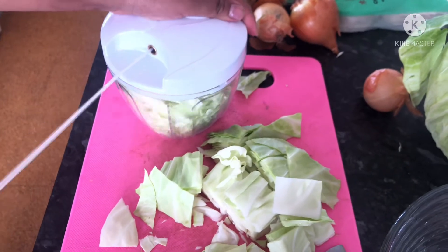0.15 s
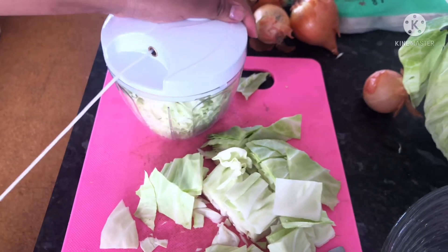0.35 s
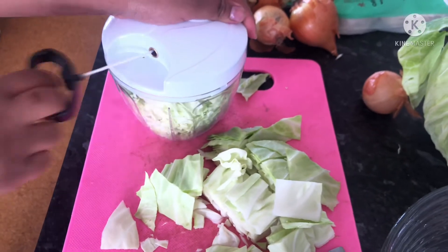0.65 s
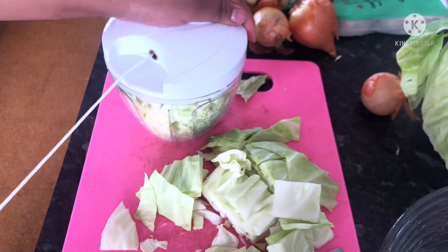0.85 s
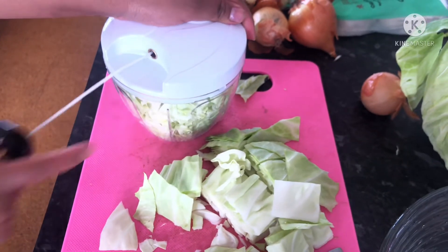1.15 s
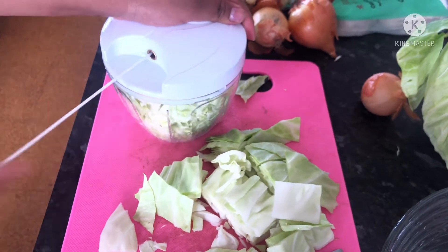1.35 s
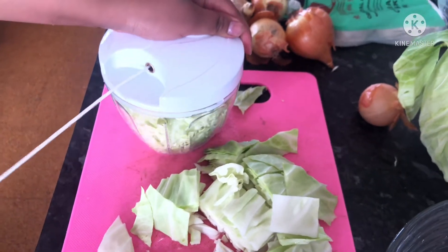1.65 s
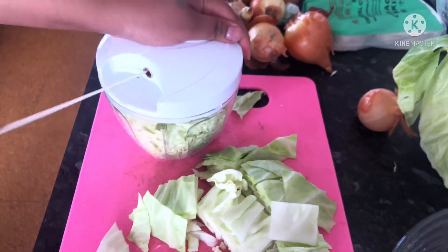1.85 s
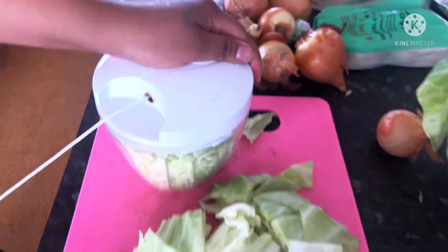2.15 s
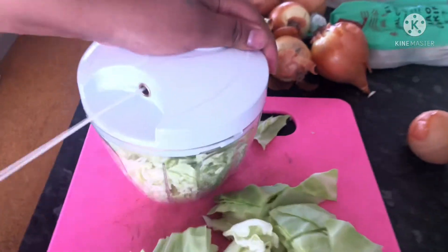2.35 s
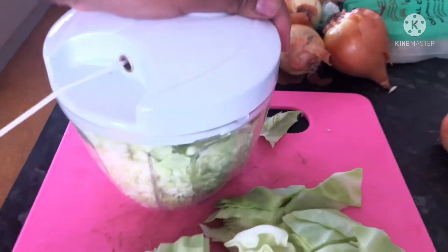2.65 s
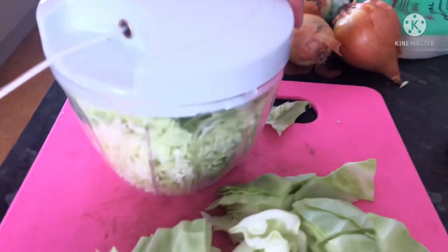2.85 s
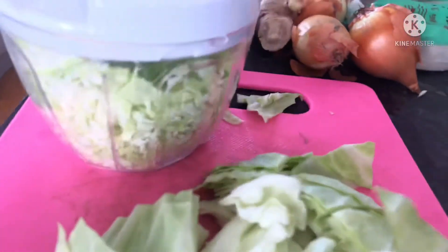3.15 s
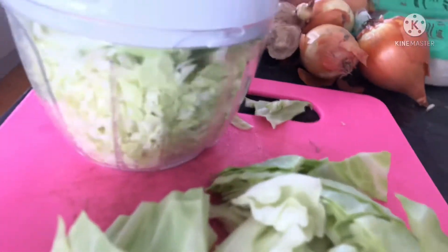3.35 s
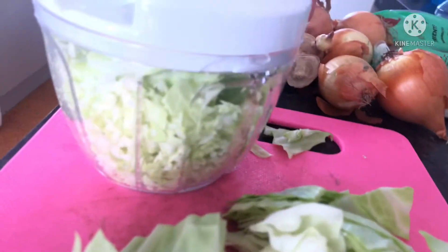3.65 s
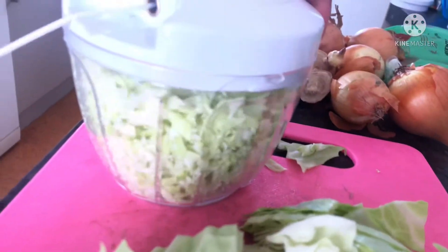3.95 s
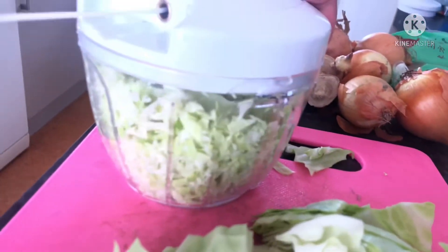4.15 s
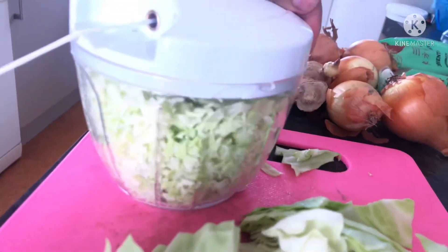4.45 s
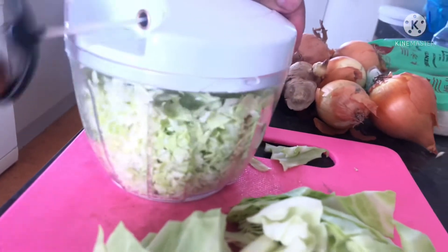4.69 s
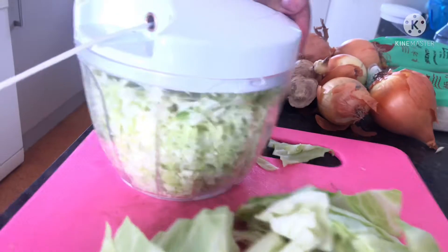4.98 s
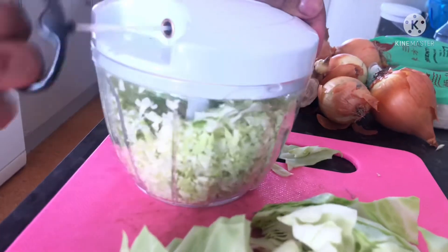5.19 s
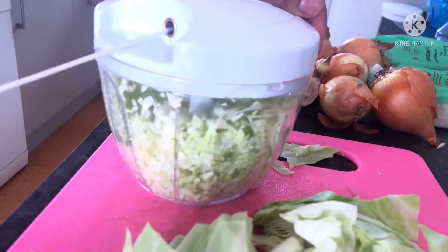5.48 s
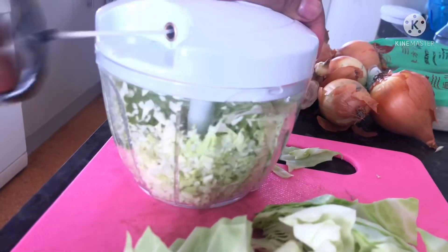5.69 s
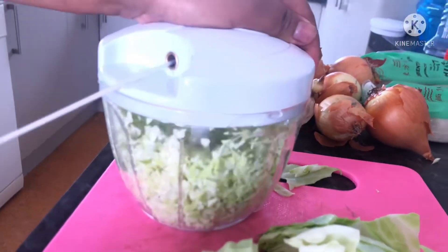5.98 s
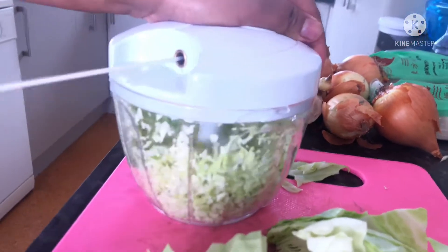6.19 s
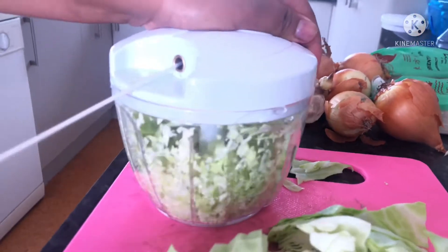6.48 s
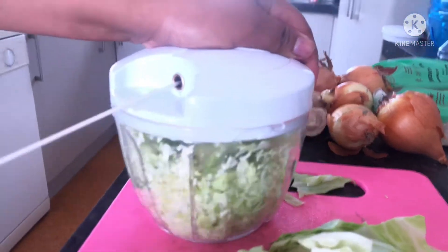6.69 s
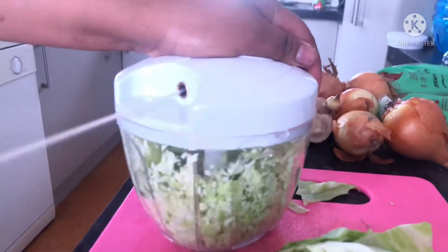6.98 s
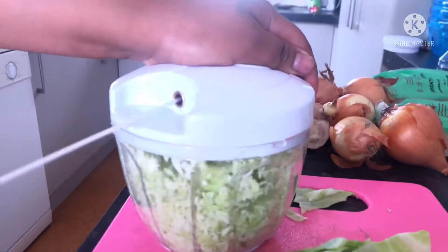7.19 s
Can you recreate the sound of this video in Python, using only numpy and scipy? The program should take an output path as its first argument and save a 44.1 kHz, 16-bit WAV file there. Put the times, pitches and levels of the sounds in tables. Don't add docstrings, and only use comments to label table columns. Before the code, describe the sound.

A small plastic pull-cord chopper is worked close to the microphone in a hard kitchen. Each stroke starts with a sharp clutch crack, then rattling gear teeth and blades knock the hollow bowl while leaves shred. The cord runs back with a fast, bright ratchet rasp that slows before the next crack. About two strokes a second, with one weaker pull early, then louder and fuller as the microphone nears.

```python
import sys
import numpy as np
from scipy import signal
from scipy.fft import rfft, irfft, next_fast_len
from scipy.io import wavfile
from scipy.ndimage import uniform_filter1d

SR = 44100
rng = np.random.default_rng(int(sys.argv[2]) if len(sys.argv) > 2 else 0)


def boost_factor(decibels):
    exponent = np.asarray(decibels, float) / 20
    return 10 ** exponent


def to_wav(s):
    ch = np.atleast_2d(s).T
    pcm = np.round(np.clip(ch, -1, 1) * 32767)
    wavfile.write(sys.argv[1], SR, pcm.astype(np.int16))


N = 323253
T = np.arange(N) / SR

# let_go_s, fastest_s, spring_spent_s, ratchet_db, bowl_share_db
REWINDS = [(-.1, -0.033, .105, -17, -5), (0.416, 0.482, .67, -17.5, -4), (0.94, 0.961, 1.2, -21.5, -4),
           (1.699, 1.769, 1.955, -21.5, -4), (2.269, 2.328, 2.54, -18, -4),
           (2.861, 2.924, 3.135, -15.5, -6), (3.493, 3.548, 3.73, -13.5, -6.5),
           (3.99, 4.073, 4.24, -13, -7.5), (4.519, 4.59, 4.76, -13.5, -7), (5.023, 5.099, 5.245, -12, -7),
           (5.521, 5.574, 5.73, -13, -5), (6.011, 6.058, 6.21, -13, -6), (6.46, 6.522, 6.655, -13.5, -5),
           (6.921, 6.979, 7.115, -13.5, -5)]
# start_s, peak_db, bowl_share_db, tooth_share_db
CATCHES = [(0.1121, 1.5, -0.5, -4), (0.6841, 5.5, -3, -10.5), (1.332, -11.5, 9, 9), (1.9596, 1, -5, -9),
           (2.5431, 6, -3.5, -6), (3.153, 4.5, -6.5, -4.5), (3.719, 6.5, -2.5, -10), (4.2472, 6, -6, -8),
           (4.769, 7.5, -3, -7.5), (5.2643, 7, -2.5, -7.5), (5.7393, 8.5, -3.5, -2.5),
           (6.2203, 8.5, -1, -3.5), (6.6508, -6, -1, -4), (7.105, 1.5, -1.5, -6)]
# full_speed_s, cord_out_s, end_bowl_db, gain_since_full_speed_db, chop_brightness_db
PULLS = [(0.187, 0.318, -10.5, 4.5, -11.5), (0.755, .87, -11.5, 4, -13.5), (1.446, 1.601, -21.5, 0, -12),
         (2.039, 2.168, -12, 4, -10.5), (2.656, 2.753, -14, -2, -8), (3.276, 3.389, -10.5, 4, -9),
         (3.774, 3.911, -8, 6, -7.5), (4.349, 4.448, -13, -4, -9), (4.837, 4.96, -10, 1.5, -9.5),
         (5.348, 5.442, -12.5, -2, -9.5), (5.839, 5.945, -15, -3.5, -9), (6.297, 6.396, -11.5, -1.47, -9),
         (6.739, 6.834, -15.5, 1.5, -9.5), (7.192, 7.283, -12, 0.65, -9)]
# start_s, peak_db
KNOCKS = [(0.2489, -3.5), (0.2976, -3), (0.3092, -12), (0.8508, -7), (1.5021, -9.5), (2.0156, -6),
          (2.0905, -1.5), (2.1173, -1), (2.155, -1), (2.1701, -2), (2.6471, -2.5), (2.6693, -1.5),
          (2.699, -1), (2.7419, -3.5), (3.2937, -7), (3.3563, -6), (3.3717, -1), (3.7681, -5), (3.8299, 1),
          (3.871, -1), (4.3187, -3.5), (4.4413, -5), (4.8748, -3), (4.9311, 1.5), (4.9757, -3),
          (5.3327, -1), (5.8676, -1), (6.3032, -2), (7.2047, 1), (7.2657, -2),
          (0.1394, -26), (0.1687, -16), (0.717, -18), (0.7481, -10), (1.356, -16), (1.3803, -20),
                (1.4503, -15), (1.5745, -14), (1.6073, -18), (3.813, -6), (3.8526, -4), (2.62, -11),
                (3.2387, -11), (4.267, -11), (4.8166, -6), (5.794, -12), (6.2514, -12), (6.2703, -7),
                (6.329, -16), (6.7229, -21), (7.1776, -6), (7.195, -4)]
# start_s, peak_db
TICKS = [(0.3315, -2.5), (0.4556, -9), (0.886, -12), (2.101, -10), (2.1747, -9), (2.4003, -12),
         (4.0012, -32), (2.2686, -8), (2.4331, -20), (2.7487, -7), (2.8617, -6), (3.0177, -15.5),
         (3.3696, -8.5), (3.8502, -12.5), (3.8967, -1), (3.9183, 2.5), (4.3718, -11), (4.4414, -5),
         (4.8902, -3), (4.9309, -2), (4.9517, -2), (5.4197, -7), (5.8677, -21), (5.9409, -1), (6.0088, -4),
         (6.3879, -5.5), (6.5891, -13), (6.8101, -9), (6.9199, -17), (7.2876, -4)]
# start_s, peak_db
DYING_TICKS = [(1.1224, -11), (1.1607, -14), (1.2099, -19), (1.2445, -27), (1.2703, -14.5), (1.2955, -42),
               (2.479, -5), (2.5088, -19), (3.1261, -25), (5.7043, -17), (6.8939, -22.5)]
# start_s, peak_db
ROCKS = [(0.4556, -16), (0.5026, -4.5), (0.5301, -4), (0.5585, -4.5), (2.984, -4), (1.6849, -14),
         (1.8008, -10), (3.037, -12), (3.0949, -15.5), (3.518, -9), (3.5442, -5.5), (3.5968, 0.5),
         (3.6228, -13), (4.118, -13), (4.1448, -7), (4.6278, -8), (4.6563, -12), (5.13, -9), (6.0783, -16),
         (6.1055, -6), (6.1348, -10), (6.5295, -9.5), (6.9832, -14), (7.0044, -7.5), (2.955, -12),
         (3.0226, -19), (1.05, -25)]
# time_s, pitch_hz, level_db
CORD = [
    (1.02, 223.7, -58),
    (1.04, 219, -31),
    (1.11, 214, -34),
    (1.135, 218, -60),
]
# time_s, level_db
GRIP = [(.2, -11.5), (.85, -5.5), (1.5, -12), (2.7, -18), (3.4, -25), (4.3, -20), (4.9, -8), (5.5, -11),
        (6.3, -14.5), (7.2, -13)]
# time_s, bass_db, lid_tone_db
PHONE_PATH = [
    (0, -8, 3),
    (2.4, -4, 2.5),
    (3.2, 1.5, 8),
    (4, 2, -4),
    (7.33, 3, -7),
]

# pitch_hz, width_hz, level_db
BOWL = [(259, 21, 1.5), (525, 64, -31), (726, 190, 1), (1100, 540, -3.5), (1698, 430, 0.5),
        (3170, 230, -10)]
# pitch_hz, width_hz, level_db
SPRING = [(6310, 240, -7.5), (7670, 390, -3), (8470, 390, 1), (9590, 350, 1.5), (10700, 230, -4),
          (11600, 340, -7)]
# pitch_hz, density_db_per_hz
RASP = [(2240, -60), (3800, -20), (4480, -2), (5390, -8), (6780, -3.5), (8490, 2.5), (10200, -11),
        (12000, -2), (15600, -14.5)]
# pitch_hz, density_db_per_hz
LID = [(3700, -48), (4200, 8), (4500, 11), (4800, 1), (5400, -42)]
# pitch_hz, density_db_per_hz
RUMBLE = [(24, -78), (40, -35), (76, -4), (560, -2), (734, -7.5), (856, -17), (1710, 2), (2120, -10.5),
          (2880, -2.5), (4000, -21.5), (5200, -53), (8800, -120)]
# pitch_hz, density_db_per_hz
SNAP = [(1000, -11), (2000, -2.5), (3100, 6), (4000, -5.5), (6000, -3.5), (9000, -21.5), (15600, -36)]
# pitch_hz, density_db_per_hz
CLUTCH = [(120, -31), (200, -31), (730, 1), (1750, -2), (3980, -12.5), (5130, -6), (6620, -15), (8390, -3),
          (9710, -9), (15600, -23)]
# pitch_hz, density_db_per_hz
DRONE = [(24, -44), (40, -32), (145, -11), (445, -7), (480, -0.5), (560, -1.5), (793, 6), (890, -0.5),
         (1750, -5.5), (4000, -20), (5200, -48), (8800, -120)]
# pitch_hz, density_db_per_hz
WALL = [(700, -41), (770, -8), (797, 7), (825, -24.5), (900, -35)]
# pitch_hz, density_db_per_hz
CHOP = [(1470, -40), (2500, -8), (4110, -3), (6030, -2.5), (9780, -11), (12500, -10.5), (15600, -26)]
# pitch_hz, density_db_per_hz
AIR = [(18, -19), (30, -28), (194, 7.5), (1010, -16.5), (1430, -33), (6380, -18), (16000, -39)]
# pitch_hz, t60_s
KITCHEN = [(200, 0.62), (2000, 0.42), (10000, 0.21)]

SNAP_BAND, TREBLE_BAND, RATCHET_BAND = (1800, 6000), (3000, 14000), (7000, 13000)
DRONE_BAND, RUMBLE_BAND = (400, 2500), (200, 2500)


def unit(x):
    return x / np.sqrt(np.mean(x ** 2) + 1e-20)


def along(points, hz):
    f, v = np.transpose(points)
    return np.interp(np.log(hz + 1), np.log(f + 1), v)


def split_events(events):
    s, db = np.transpose(events)
    return s, boost_factor(db)


def near(column):
    return boost_factor(np.interp(T, *np.transpose(PHONE_PATH)[[0, column]]))


def strokes(corners, fade):
    rows = []
    for first, *rest, last in corners:
        rows += [(first[0] - fade, -90, first[2]), first, *rest, last, (last[0] + fade, -90, last[2])]
    s, level_db, share_db = np.transpose(rows)
    return np.interp(T, s, level_db), np.interp(T, s, share_db)


def body(x, spectrum, modes, lift_db, band_hz):
    m = 2 * next_fast_len(N // 2 + 4096)
    hz = np.fft.rfftfreq(m, 1 / SR)
    colour_db = along(spectrum, hz)
    peaks = sum(boost_factor(2 * db) * w * w / (4 * (hz - c) ** 2 + w * w) for c, w, db in modes)
    lifted = boost_factor(2 * lift_db) * peaks / boost_factor(2 * np.maximum(colour_db, -20))
    gain = boost_factor(np.maximum(colour_db, -70)) * np.sqrt(1 + lifted)
    cep = irfft(np.log(gain), m)
    cep[1:m // 2] *= 2
    cep[m // 2 + 1:] = 0
    norm = np.sqrt(np.mean(gain ** 2 * (hz > band_hz[0]) * (hz < band_hz[1])))
    return irfft(rfft(x, m) * np.exp(rfft(cep)), m)[:N] / norm


def teeth(rate, jitter, scatter_db):
    count = np.cumsum(rate) / SR
    k = np.arange(1, int(count[-1]))
    uneven = jitter * rng.uniform(-1, 1, N // 64)[:len(k)]
    at = np.interp(k + uneven, count, np.arange(N)).astype(int)
    size = boost_factor(scatter_db * rng.standard_normal(N // 64)[:len(k)])
    return np.bincount(at, size, N)


def scrape(hits, t60, steady):
    soft = uniform_filter1d(hits, size=64)
    flare = signal.lfilter([1], [1, -boost_factor(-60 / (t60 * SR))], soft)
    return unit((unit(flare) + steady) * rng.standard_normal(N))


def bursts(events, t60, rise):
    hits = np.bincount(np.round(events[0] * SR).astype(int), events[1], N)[:N]
    t = np.arange(SR // 20) / SR
    shape = boost_factor(-60 * t / t60) * (1 - np.exp(-t / rise))
    return signal.fftconvolve(hits, shape)[:N] * rng.standard_normal(N)


def rewind_levels():
    let_go_db, jump_s, jump_db = -9.5, .025, -5.5
    hush_s = .008
    sag_db, stop_db, stop_power = 7.5, 21.5, 3.21
    linger = 0.31
    corners = []
    for (go, fast, spent, db, share_db), catch in zip(REWINDS, CATCHES):
        s = np.linspace(fast, catch[0] - hush_s, num=16)
        relaxed = (s - fast) / (spent - fast)
        slowed_db = np.minimum(stop_db * relaxed ** stop_power, 26)
        start = (go, db + let_go_db, share_db)
        jump = (min(go + jump_s, fast - .001), db + jump_db, share_db)
        run_down = zip(s, db - sag_db * relaxed - slowed_db, share_db + linger * slowed_db)
        corners.append([start, jump, *run_down])
    return strokes(corners, fade=.004)


def rewind():
    rasp_db, share_db = rewind_levels()
    speed = np.clip(2 + .025 * (rasp_db + 16), .2, 1.3)
    rocks = teeth(38 * speed, jitter=0.19, scatter_db=3.5)
    clicks = teeth(210 * speed, jitter=0.3, scatter_db=3.5)
    rasp = boost_factor(rasp_db - 1.5) * scrape(clicks + .4 * rocks, t60=.012, steady=.55)
    lid = boost_factor(rasp_db - 19.5) * near(column=2) * scrape(clicks, t60=0.04, steady=0.81)
    rumble = boost_factor(rasp_db + share_db - 1.0) * scrape(rocks + 0.14 * clicks, t60=0.022, steady=1.0)
    bright = body(rasp, RASP, SPRING, lift_db=7.0, band_hz=RATCHET_BAND)
    bright += body(lid, LID, SPRING, lift_db=-60, band_hz=(3700, 5400))
    return bright + body(rumble, RUMBLE, BOWL, lift_db=0.0, band_hz=RUMBLE_BAND)


def catches():
    s, db, share_db, tooth_db = np.transpose(CATCHES)
    tooth = bursts((s, boost_factor(db + tooth_db - 9.0)), t60=0.015, rise=0.00085)
    crack = bursts((s - .001, boost_factor(db - 11.5)), t60=0.02, rise=0.0014)
    scratch = bursts((s - .003, boost_factor(db - 36.0)), t60=0.025, rise=0.00035)
    thud = bursts((s, boost_factor(db + share_db - 11.5)), t60=0.047, rise=0.0018)
    slam = body(tooth, SNAP, BOWL, lift_db=-12, band_hz=SNAP_BAND)
    slam += body(crack + scratch, CLUTCH, SPRING, lift_db=-1, band_hz=(2500, 14000))
    return slam + body(thud, RUMBLE, BOWL, lift_db=24, band_hz=DRONE_BAND)


def pull_levels():
    take_up_s, start_db, start_follows = .016, -26.5, 0.28
    arch_db = 1.5
    coast_share, coast_db, rest_db, dull_db = .6, -13.5, -17, -5
    let_go = [row[0] for row in REWINDS[1:]] + [N / SR + 0.038]
    corners = []
    for catch, (full, out, db, gain_db, bright_db), end in zip(CATCHES, PULLS, let_go):
        corners.append([
            (catch[0] + take_up_s, start_db + start_follows * (db + 12), bright_db),
            (full, db - gain_db, bright_db),
            ((full + out) / 2, db - gain_db / 2 + arch_db, bright_db),
            (out, db, bright_db),
            (out + coast_share * (end - out), db + coast_db, bright_db + dull_db),
            (end, db + rest_db, bright_db)])
    return strokes(corners, fade=.01)


def pull():
    bowl_db, bright_db = pull_levels()
    teeth_per_s = np.clip(150 + 5 * (bowl_db + 16.5), 40, 240)
    gears = teeth(teeth_per_s, jitter=0.19, scatter_db=5.0)
    drone = boost_factor(bowl_db - 3) * scrape(gears, t60=.02, steady=.6)
    chop = boost_factor(bowl_db + bright_db - 6) * scrape(gears, t60=.012, steady=.45)
    ring = boost_factor(bowl_db + np.interp(T, *np.transpose(GRIP))) * rng.standard_normal(N)
    low = body(drone, DRONE, BOWL, lift_db=-2.5, band_hz=DRONE_BAND)
    low += body(ring, WALL, BOWL, lift_db=-60, band_hz=(700, 900))
    return low + body(chop, CHOP, SPRING, lift_db=-4.0, band_hz=TREBLE_BAND)


def mesh():
    rate_per_s, rate_per_db = 68, 1.1
    size_db, size_grows = 3, 1.15
    scatter_db, jitter_teeth = 2, .12
    bowl_db = pull_levels()[0]
    turned = np.cumsum(np.clip(rate_per_s + rate_per_db * (bowl_db + 12), 5, 90)) / SR
    s, gain = split_events(KNOCKS)
    anchors = np.sort(np.r_[s, np.transpose(CATCHES)[0], T[-1]])
    marks = np.interp(anchors, T, turned)
    passed = np.concatenate([np.linspace(a, b, max(round(b - a), 1) + 1)[1:-1]
                             for a, b in zip(marks, marks[1:])])
    chance = rng.standard_normal((N // 64, 2))[:len(passed)]
    at = np.interp(passed + jitter_teeth * chance[:, 0], turned, T)
    db = size_grows * (np.interp(at, T, bowl_db) + 11) - 13 + size_db + scatter_db * chance[:, 1]
    return np.r_[s, at], np.r_[gain, boost_factor(db)]


def tooth_knocks():
    blows = mesh()
    snap = bursts(blows, t60=0.013, rise=0.0013)
    thump = boost_factor(-3.5) * bursts(blows, t60=0.024, rise=0.001)
    edge = boost_factor(-9) * bursts(blows, t60=0.0085, rise=0.00035)
    knock = body(snap, SNAP, BOWL, lift_db=-27, band_hz=SNAP_BAND)
    knock += body(edge, CHOP, SPRING, lift_db=-6, band_hz=TREBLE_BAND)
    return knock + body(thump, DRONE, BOWL, lift_db=8.0, band_hz=DRONE_BAND)


def bright_ticks():
    clicks = split_events([*TICKS, *[(s, db - 3) for s, db in DYING_TICKS]])
    tick = boost_factor(-4.0) * bursts(clicks, t60=0.01, rise=0.0002)
    return body(tick, RASP, SPRING, lift_db=22, band_hz=RATCHET_BAND)


def spool_rocks():
    rock = bursts(split_events(ROCKS), t60=0.023, rise=0.00094)
    snap = boost_factor(-7.5) * body(rock, SNAP, BOWL, lift_db=-29, band_hz=SNAP_BAND)
    return snap + boost_factor(-1.0) * body(rock, RUMBLE, BOWL, lift_db=4, band_hz=RUMBLE_BAND)


def cord():
    s, hz, db = np.transpose(CORD)
    phase = 2 * np.pi * np.cumsum(np.interp(T, s, hz)) / SR
    return boost_factor(np.interp(T, s, db, -120, -120)) * np.sin(phase)


def room(x):
    hz, t, z = signal.stft(rng.standard_normal(SR // 2), SR, nperseg=256)
    decay = boost_factor(-60 * t / along(KITCHEN, hz)[:, None])
    tail = signal.istft(z * decay, SR, nperseg=256)[1]
    delayed = np.pad(x, (200, 0))
    return signal.fftconvolve(delayed, tail / np.linalg.norm(tail))[:N]


def room_floor():
    return boost_factor(-41.5) * body(rng.standard_normal(N), AIR, SPRING, lift_db=-60, band_hz=(30, 16000))


def scene():
    chopper = rewind() + catches() + pull() + tooth_knocks() + bright_ticks() + spool_rocks()
    bass = signal.lfilter(*signal.butter(1, 380, fs=SR), chopper)
    chopper = chopper + (near(column=1) - 1) * bass + cord()
    return (chopper + boost_factor(-17) * room(chopper) + room_floor())[None]


def roll_off(x):
    return signal.sosfilt(signal.butter(12, 16380, fs=SR, output="sos"), x)


def record(dry):
    flat = dry / (1 + np.abs(dry) ** 12) ** (1 / 12)
    thin = signal.sosfiltfilt(signal.butter(2, 40, "high", fs=SR, output="sos"), flat)
    in_band = np.fft.rfftfreq(N, 1 / SR) < 15780
    return roll_off(irfft(rfft(thin) * in_band, N))


dry = scene()
out = record(dry)
to_wav(out)
```